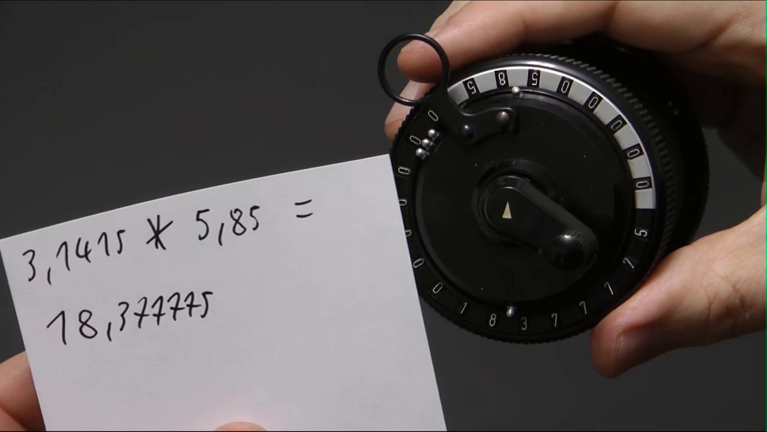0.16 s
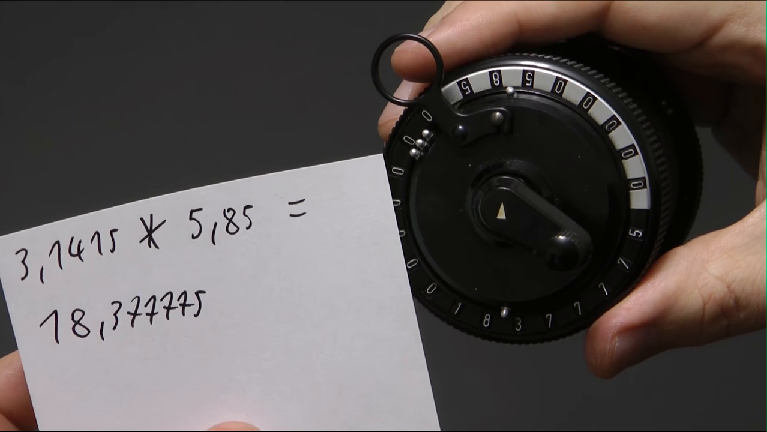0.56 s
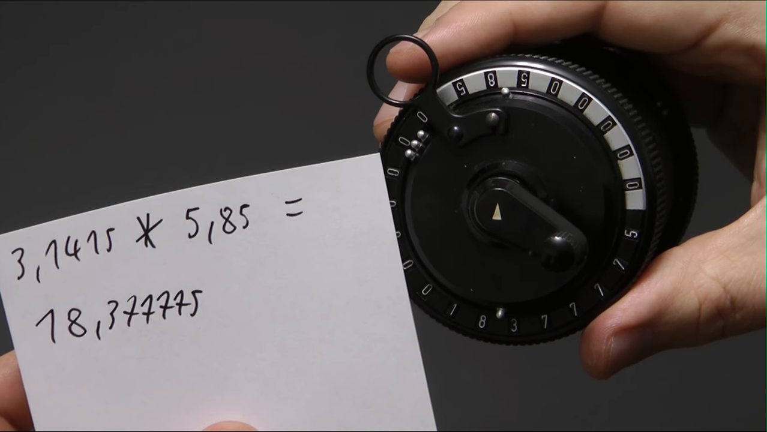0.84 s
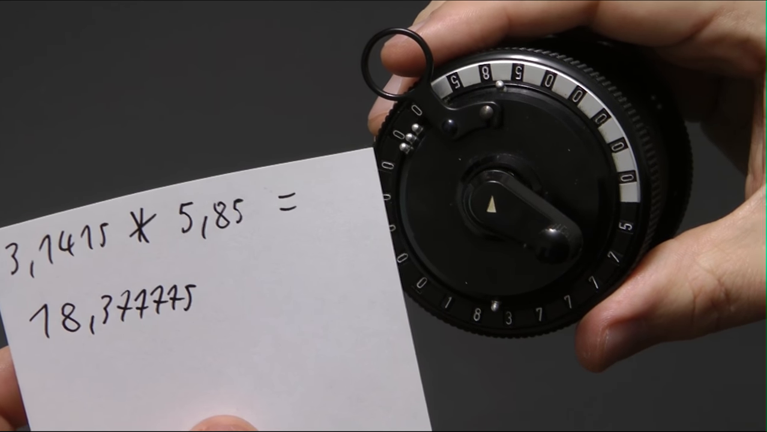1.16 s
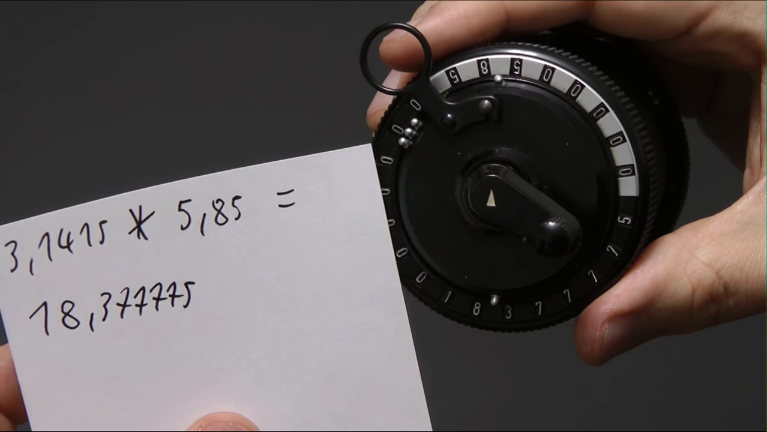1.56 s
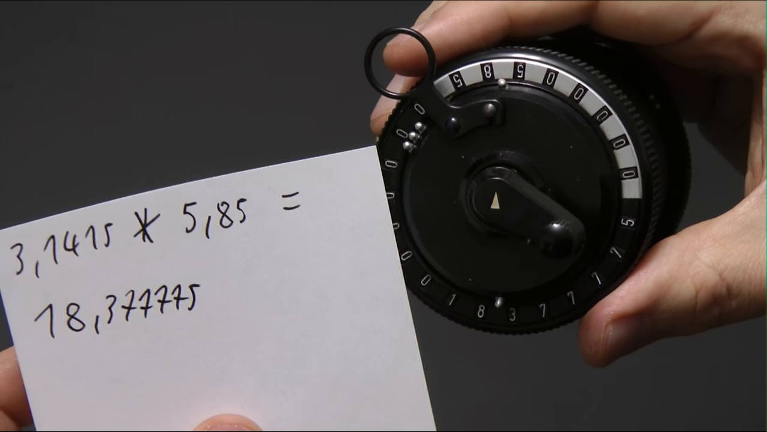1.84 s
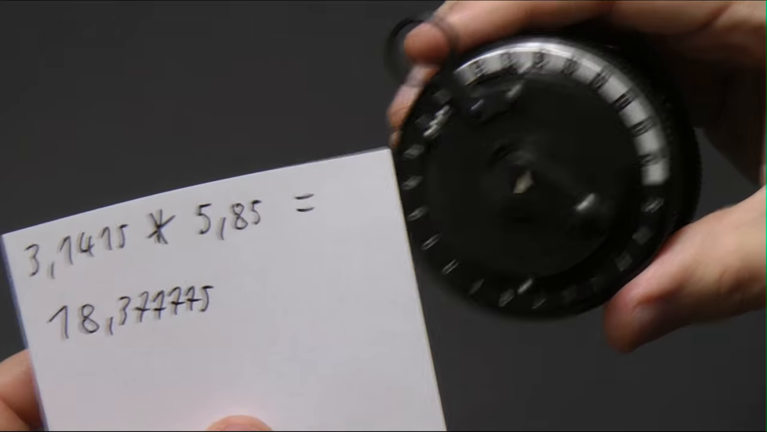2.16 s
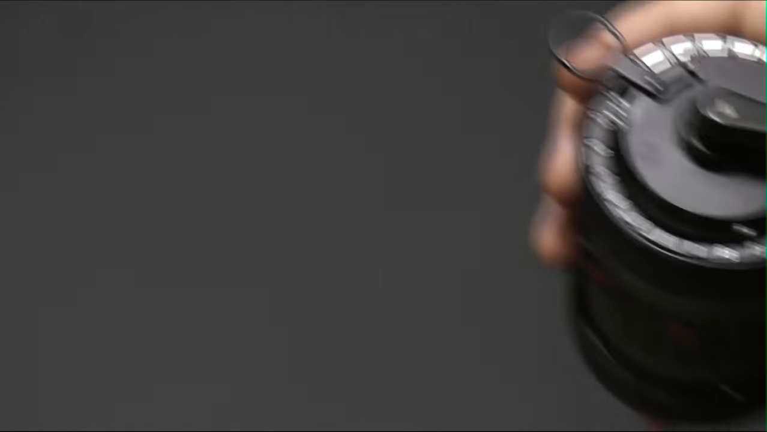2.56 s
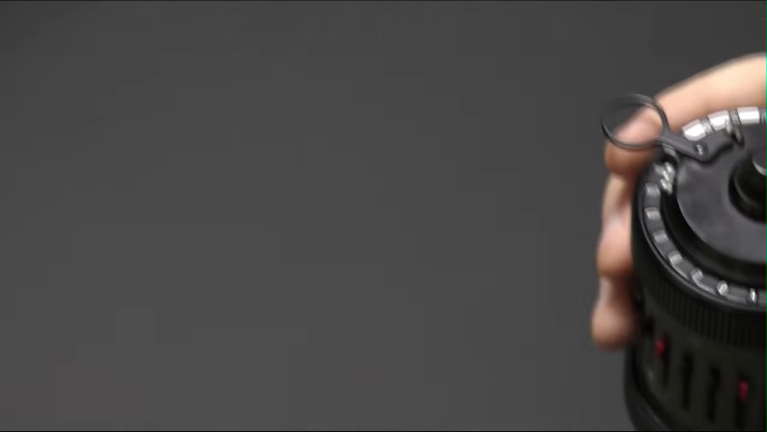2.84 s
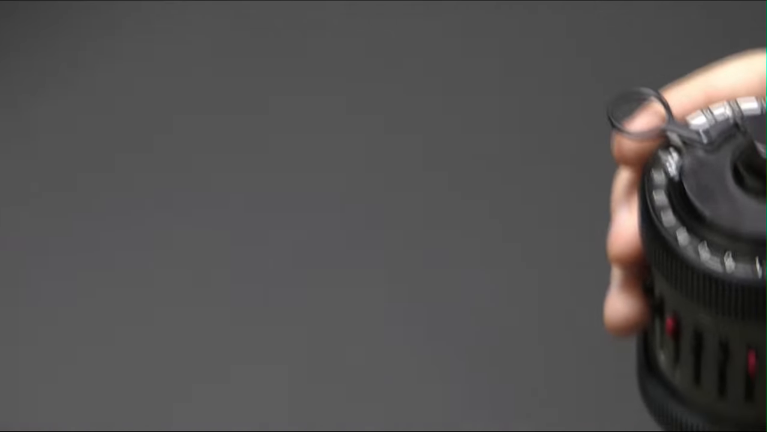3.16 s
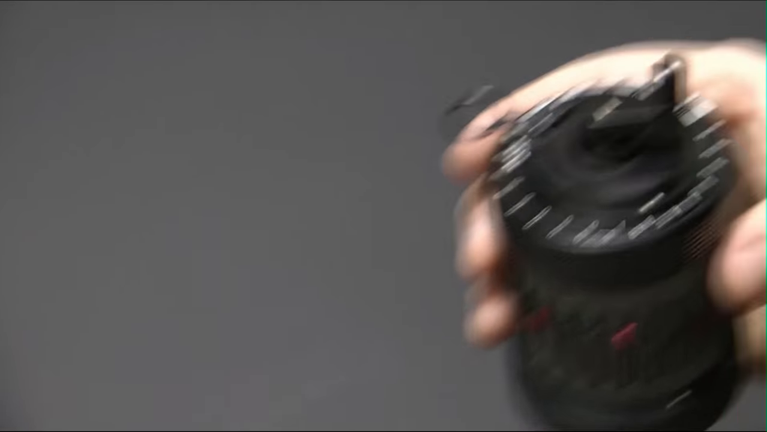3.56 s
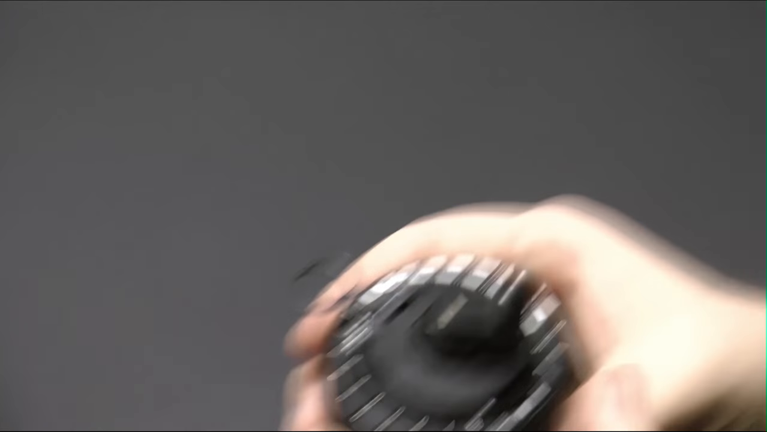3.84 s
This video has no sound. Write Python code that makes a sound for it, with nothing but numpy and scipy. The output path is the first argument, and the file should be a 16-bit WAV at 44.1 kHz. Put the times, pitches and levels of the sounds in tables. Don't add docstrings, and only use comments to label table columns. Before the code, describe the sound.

Small metal hand calculator handled close up, clacking twice on wood with ticks and paper rubs

```python
import sys
import numpy as np
from scipy import signal
from scipy.fft import rfft, irfft, next_fast_len
from scipy.io import wavfile
from scipy.ndimage import uniform_filter1d, map_coordinates

SR = 44100
rng = np.random.default_rng(int(sys.argv[2]) if len(sys.argv) > 2 else 0)


def magnitude_from_level(level_db):
    exponent = np.asarray(level_db, float) / 20
    return 10 ** exponent


def master(y):
    cut = np.clip(np.atleast_2d(y).T, -1, 1)
    pcm = np.round(cut * 32767)
    wavfile.write(sys.argv[1], SR, pcm.astype(np.int16))


N = 176400

# (time [s], level [dB], rattle length [s], attack [s])
CLACKS = [
    (2.641, -25, 0.017, 0.0054),
    (3.573, -22, 0.021, .0018),
]
# (frequency [Hz], density [dB per Hz])
RATTLE_SPECTRA = [
    [(90, -25), (210, -5.5), (390, -11.5), (690, -7.5), (1700, -14.5), (3500, -11.5), (5500, -18),
     (13000, -45.5)],
    [(90, -28), (250, -7), (1580, -4), (2720, -6.5), (3500, -7.5), (4900, -8), (7300, -19.5), (14500, -49)],
]
# (frequency [Hz], level [dB], t60 [s])
BODY_MODES = [
    [(266, -8, 0.13), (681, 2, 0.11), (811.1, -9, 0.13223), (1035, -5, .18), (1900, -20, 0.1203),
     (2320, -9, 0.1854), (2640, -14, .15), (3030, -16, 0.13), (3373, -19, .1), (4150, -19.5, .15),
     (4660, -22, .12)],
    [(262, -8, 0.13), (660, -1, 0.12), (1025, -5, 0.3867), (844, -12, .35), (1270, -8, 0.2521),
     (1420, -13, 0.329), (1560, -14.5, 0.1426), (1936, -3.5, 0.16), (2240, -4, 0.2412), (2405, -12, 0.307),
     (3040, -12.5, 0.33), (3970, -12, .2), (4081.4, -21, 0.236), (4410, -3, 0.05)],
]
# (frequency [Hz], width [Hz], gain [dB])
HOLLOWS = [
    [(424.8, 80, -3.5), (1516, 300, 0.5)],
    [(410, 88.25, -5.5), (1720, 61.76, -2), (2730, 190, -4), (3800, 150, -2.5)],
]
# (frequency [Hz], width [Hz], level [dB], t60 [s])
CASE_BLUR = (3500, 220, -30.5, .62)
# (frequency [Hz], level [dB], t60 [s])
CASE_MODES = [(3391, -38, .5), (3432, -41, .5), (3502, -36, .55), (3552, -37, .5), (3573, -39, .4)]
# (time [s], level [dB], brightness [dB])
PAPER_STROKES = [
    [(2.15, -61, 4), (2.27, -51.5, 2), (2.3, -46.5, 5), (2.44, -45, 4.5), (2.48, -41, 6.5),
     (2.55, -38, 1.5), (2.63, -38.5, 1), (2.73, -43, 2.5), (2.75, -53, -1)],
    [(2.86, -78, 6), (2.895, -46, -2.5), (2.95, -44, -1.5), (2.98, -38.5, 4), (3.02, -38.5, 4.5),
     (3.07, -36.5, 2), (3.11, -39.5, -0.5), (3.14, -47.5, 1.5), (3.22, -55.5, -5)],
]
# (frequency [Hz], density [dB per Hz])
PAPER_SPECTRA = [
    [(180, -39), (300, -7), (809, -3), (924, -2.5), (1110, -2), (3140, -6.5), (15600, -28)],
    [(290, -52.5), (500, -11.5), (1310, -9), (1700, -5), (1910, -7), (2440, -2.5), (6590, -11.5),
     (15600, -30)],
]
# (time [s], peak [dB], pitch [Hz], t60 [s])
TICKS = [(1.098, -46, 3244, 0.01844), (1.103, -41, 2570, 0.0351), (1.117, -32, 1975, 0.017),
         (1.132, -37, 1682, 0.0167), (1.4835, -28, 2240, 0.01675), (1.503, -46, 2371, 0.05),
         (2.095, -47, 1820, 0.024), (2.539, -40.5, 2743, 0.013), (2.5625, -13, 2800, 0.02),
         (2.562, -30, 5200, .012), (2.646, -27, 3450, 0.0239), (2.657, -31, 4700, 0.01529),
         (3.021, -32, 4099, 0.01933), (3.058, -30, 3800, 0.02446), (3.069, -40, 2921, 0.01693),
         (2.965, -33.5, 2320, 0.053), (2.983, -28, 2500, 0.032), (2.987, -24, 2720, 0.031),
         (3.047, -31, 1550, .02), (3.004, -36, 1822, 0.0172), (3.047, -20, 2540, 0.01813),
         (3.086, -25, 2430, 0.028), (3.107, -39, 2497, 0.035), (3.073, -31, 4449, 0.032),
         (3.078, -35, 6474, 0.0327), (2.563, -28, 4150, 0.015), (3.84, -37, 4730, .02),
         (3.925, -26.5, 5120, 0.015)]
# (pitch ratio [-], level [dB])
TICK_SIDE_MODES = [(1.11, -9), (.89, -9), (.6, -13), (1.5, -18)]
# (time [s], peak [dB], pitch [Hz], t60 [s])
TAPS = [(1.119, -35, 853, 0.0365), (2.642, -21.5, 1050, 0.036), (2.665, -28.5, 628.9, 0.03263),
        (3.575, -22.5, 707.6, 0.052), (2.677, -31, 950, .025), (2.689, -24, 878, .025),
        (2.738, -26.5, 698.5, 0.035), (2.783, -32, 890, 0.042), (3.622, -24, 1335, 0.048),
        (3.718, -31, 644.7, 0.029), (3.762, -30.5, 1270, .03), (1.134, -39.5, 944, 0.044),
        (2.541, -38, 1010, 0.022), (3.427, -29.5, 856.2, 0.02728), (3.84, -34, 666, .03),
        (3.924, -22, 735, 0.017), (3.937, -42, 690, 0.024)]
# (pitch ratio [-], level [dB])
TAP_SIDE_MODES = [(1.255, -2.5), (0.82, -15), (1.6, -8.5), (2.6, -4), (5.1, -13.5)]
# (time [s], peak [dB], pitch [Hz], t60 [s])
THUDS = [(2.474, -39, 246, 0.07934), (2.481, -26.5, 229, 0.0575), (2.492, -35.5, 203, 0.086),
         (2.514, -27, 170, 0.04), (2.77, -40, 151, .1), (2.97, -43, 120, 0.089), (2.654, -24.5, 262, 0.096),
         (3.58, -26.5, 249.9, 0.11)]
# (pitch ratio [-], level [dB])
THUD_SIDE_MODES = [(1.418, -5), (0.63, -14)]
# (time [s], level [dB])
RUBBING = [(2.2, -60), (2.5, -48.5), (3.3, -56), (3.55, -55), (4, -51)]
# (frequency [Hz], density [dB per Hz])
SKIN_SPECTRUM = [(700, -26), (1500, -0.5), (4000, -2), (7000, -8), (15000, -24)]
# (frequency [Hz], t60 [s])
ROOM_T60 = [(150, 0.56), (280, 0.44), (600, 0.64), (3000, 0.61), (8000, 0.5), (14000, 0.56)]
# (time [s], pitch [Hz])
FAN_PITCH = [(0, 969.5), (.5, 959.5), (1.0, 951.5), (1.4, 948.3), (2.6, 949), (3.0, 957), (3.3, 957.5),
             (3.55, 963), (3.75, 973), (4, 976)]
# (multiple of pitch [-], rms [dB])
FAN_ORDERS = [(.5, -55.5), (1, -53.5), (1.5, -72)]
# (frequency [Hz], width [Hz], rms [dB])
HUMS = [(119.4, 2.1, -64), (71.7, 3.8, -70), (257.63, 7.8, -65.5), (564.18, 3.043, -73.5)]
# (frequency [Hz], rms [dB])
STEADY_TONES = [(119.9, -59), (3252, -87), (3415, -77), (3871, -76.5), (4716, -75.5), (6697, -87),
                (8371, -80.5)]
# (time [s], frequency [Hz], rms [dB])
DRIFTING_WHISTLE = [(0, 1726, -70), (.75, 1697, -64.5), (1.0, 1675, -67), (1.27, 1701, -64),
                    (1.85, 1712, -62.5), (2.1, 1690, -73.5)]
# (frequency [Hz], density [dB per Hz])
AIR_SPECTRUM = [(15, -47), (25, -6), (45, -17), (90, -6), (300, -10.5), (900, -9.5), (2500, -22.5),
                (7000, -32.5), (15600, -36)]
# (time [s], level [dB])
AIR_LEVEL = [(0, -53), (.7, -51), (2.2, -51), (4, -50)]


def unit(x):
    return x / np.sqrt(np.mean(x ** 2) + 1e-20)


def along(points, hz):
    f, v = np.transpose(points)
    return np.interp(np.log(hz + 1), np.log(f + 1), v)


def curves(rows):
    s, *cols = np.transpose(rows)
    return [np.interp(np.arange(N) / SR, s, c) for c in cols]


def wobble(rate_hz):
    knots = rng.standard_normal(int(N * rate_hz / SR) + 4)
    return map_coordinates(knots, [np.arange(N) * rate_hz / SR])


def filtered(x, response):
    m = next_fast_len(N + SR // 2)
    return irfft(rfft(x, m) * response(np.fft.rfftfreq(m, 1 / SR)), m)[..., :N]


def rush(spectrum, patchy_db, grainy_db):
    grainy = rng.standard_normal(N) * magnitude_from_level(grainy_db * wobble(400))
    z = signal.stft(grainy, nperseg=512)[2]
    field = uniform_filter1d(uniform_filter1d(rng.standard_normal(z.shape), 6, 0), 8, 1)
    x = signal.istft(z * magnitude_from_level(patchy_db * unit(field)), nperseg=512)[1][:N]
    return unit(filtered(x, lambda hz: magnitude_from_level(along(spectrum, hz))))


def tone(hz, db, unsteady_db):
    level = np.sqrt(2) * magnitude_from_level(db + unsteady_db * wobble(14.0))
    cycles = np.cumsum(hz * np.ones(N)) / SR + rng.random()
    return level * np.sin(2 * np.pi * cycles)


def add(out, s, x):
    part = out[round(s * SR):][:len(x)]
    part += x[:len(part)]


def room(x):
    hz, t, z = signal.stft(rng.standard_normal(SR), SR, nperseg=256)
    decay = magnitude_from_level(-60 * t / along(ROOM_T60, hz)[:, None])
    tail = signal.istft(z * decay, SR, nperseg=256)[1]
    return signal.fftconvolve(np.pad(x, (200, 0)), tail / np.linalg.norm(tail))[:N]


def clacks():
    ring_db, flutter_db = -5.5, 3.5
    front_db, wet_db = 1.5, -2.5
    out, t = np.zeros(N), np.arange(SR // 2) / SR
    for (s, db, length_s, attack_s), spectrum, modes, hollows in zip(
            CLACKS, RATTLE_SPECTRA, BODY_MODES, HOLLOWS):
        attack = 1 - np.exp(-t / attack_s)
        held = magnitude_from_level(-60 * np.maximum(t - length_s, 0) / 0.23)
        front = magnitude_from_level(front_db - 60 * t / 0.039)
        ring = np.zeros(len(t))
        for hz, level_db, t60_s in modes:
            envelope = magnitude_from_level(level_db + ring_db - 60 * t / t60_s + flutter_db * wobble(60.88)[:len(t)])
            ring += envelope * np.sin(2 * np.pi * (hz * t + rng.random()))
        rattle = rush(spectrum, patchy_db=1, grainy_db=1)[:len(t)]
        rattle = rattle / np.sqrt(uniform_filter1d(rattle ** 2, size=441))
        hit = np.zeros(N)
        add(hit, s, magnitude_from_level(db) * attack * ((held + front) * rattle + ring))

        def weak(f):
            return magnitude_from_level(sum(depth_db / (1 + ((f - hz) / width_hz) ** 2) for hz, width_hz, depth_db in hollows))
        out += filtered(hit + magnitude_from_level(wet_db) * room(hit), weak)
    return out


def case_ring():
    hz, width_hz, db, t60_s = CASE_BLUR
    t = np.maximum(np.arange(N) / SR - CLACKS[1][0], 0)
    noise = rng.standard_normal(N)
    blur = unit(filtered(noise, lambda f: 1 / (1 + ((f - hz) / width_hz) ** 2)))
    beats = sum(magnitude_from_level(level_db - 60 * t / life_s) * np.sin(2 * np.pi * (f * t + rng.random()))
                for f, level_db, life_s in CASE_MODES)
    return (magnitude_from_level(db - 60 * t / t60_s) * blur + beats) * (1 - np.exp(-t / 0.00271))


def paper():
    out = np.zeros(N)
    for rows, spectrum in zip(PAPER_STROKES, PAPER_SPECTRA):
        start, end = (rows[0][0] - 0.05, -90, 0), (rows[-1][0] + 0.15, -90, 0)
        db, tilt_db = curves([start] + list(rows) + [end])
        x = rush(spectrum, patchy_db=2.1, grainy_db=1.0) * magnitude_from_level(1.13 * wobble(70))
        bright = filtered(x, lambda hz: 1 / (1 + (4500 / (hz + 1)) ** 2))
        out += magnitude_from_level(db) * (magnitude_from_level(-tilt_db) * (x - bright) + magnitude_from_level(tilt_db) * bright)
    return out


def knocks(rows, side_modes, attack_s, crack_db, size):
    out, t = np.zeros(N), np.arange(SR // 8) / SR
    for s, db, hz, t60_s in rows:
        ring = np.zeros(len(t))
        for ratio, level_db in [(0.98, 0.0028)] + list(side_modes):
            envelope = magnitude_from_level(level_db + rng.normal(0, 0.761) - 60 * t * np.sqrt(ratio) / t60_s)
            ring += envelope * np.sin(2 * np.pi * ratio * hz * t)
        noise = uniform_filter1d(rng.standard_normal(len(t)), size=size) * np.sqrt(size / 3)
        crack = magnitude_from_level(crack_db - 60 * t / 0.009254) * noise
        add(out, s - attack_s, magnitude_from_level(db) * (1 - np.exp(-t / attack_s)) * (ring + crack))
    return out


def ticks():
    return knocks(TICKS, TICK_SIDE_MODES, attack_s=0.001227, crack_db=-6, size=7)


def taps():
    return knocks(TAPS, TAP_SIDE_MODES, attack_s=0.00062, crack_db=-0.5, size=4)


def thuds():
    return knocks(THUDS, THUD_SIDE_MODES, attack_s=0.0032, crack_db=-30, size=9)


def hands():
    level = magnitude_from_level(curves(RUBBING)[0] + 0.82 * wobble(16))
    return level * rush(SKIN_SPECTRUM, patchy_db=1.0, grainy_db=0.5)


def fan():
    pitch_hz = curves(FAN_PITCH)[0]
    return sum(tone(k * pitch_hz, db, unsteady_db=-0.06) for k, db in FAN_ORDERS)


def hums():
    out = np.zeros(N)
    for hz, width_hz, db in HUMS:
        noise = rng.standard_normal(N)
        out += magnitude_from_level(db) * unit(filtered(noise, lambda f: 1 / (1 + (2 * (f - hz) / width_hz) ** 2)))
    return out


def whistles():
    steady = sum(tone(hz, db, unsteady_db=1) for hz, db in STEADY_TONES)
    fade_db = -30 * np.clip(np.arange(N) / SR - 2.3, 0, 1)
    hz, db = curves(DRIFTING_WHISTLE)
    return steady + tone(hz, db + fade_db, unsteady_db=1.5)


def room_air():
    level = magnitude_from_level(curves(AIR_LEVEL)[0] + 0.23 * wobble(2.4194))
    return level * rush(AIR_SPECTRUM, patchy_db=0.68, grainy_db=0.06)


def scene():
    small_wet_db, near_wet_db = -14.5, -10.5
    small = ticks() + taps()
    near = thuds() + paper() + hands() + case_ring()
    wet = magnitude_from_level(small_wet_db) * room(small) + magnitude_from_level(near_wet_db) * room(near)
    background = room_air() + hums() + fan() + whistles()
    one = clacks() + small + near + wet + background
    return np.array([one, one])


def top_cut(x):
    return signal.sosfilt(signal.butter(12, 15780, fs=SR, output="sos"), x)


def record(dry):
    corner_hz, damping, in_phase_hz, top_hz = 600, 1.4, 1720, 15620
    left_db, left_low_db, hiss_db = -3.5, -3.5, -84
    stray_db, stray_t60_s = -9.5, 0.03

    def left(hz):
        u = 1j * hz / corner_hz
        low = magnitude_from_level(left_low_db) * u * u / (1 + damping * u + u * u)
        return np.where(hz < in_phase_hz, low, magnitude_from_level(left_db))

    x = filtered(dry, lambda hz: 2 / (1 + left(hz)) * np.array([left(hz), np.ones(len(hz))]))
    t = np.arange(SR // 20) / SR
    smear = rng.standard_normal(len(t)) * magnitude_from_level(-60 * t / stray_t60_s)
    stray = signal.fftconvolve(x[0], magnitude_from_level(stray_db) * smear / np.linalg.norm(smear))[:N]
    noise = rng.standard_normal(N)
    hiss = magnitude_from_level(hiss_db) * filtered(noise, lambda hz: np.sqrt(1 + 2500 / (hz + 30)))
    x[0] += filtered(hiss + stray, lambda hz: hz < in_phase_hz)
    return top_cut(filtered(x, lambda hz: hz < top_hz))


dry = scene()
out = record(dry)
master(out)
```